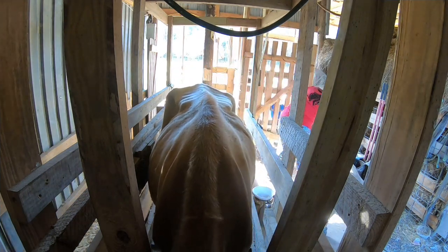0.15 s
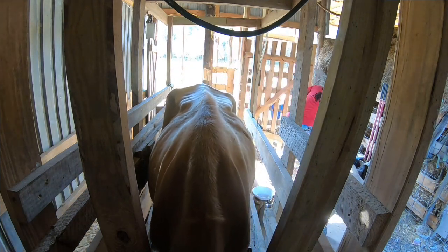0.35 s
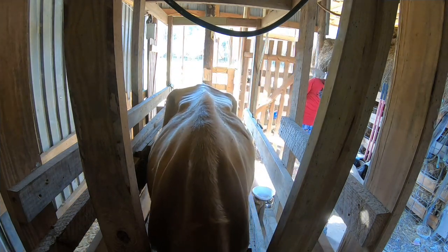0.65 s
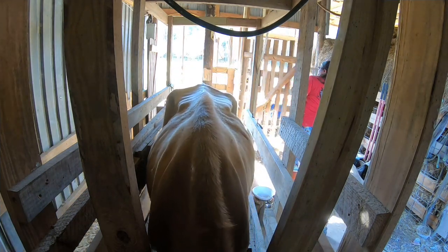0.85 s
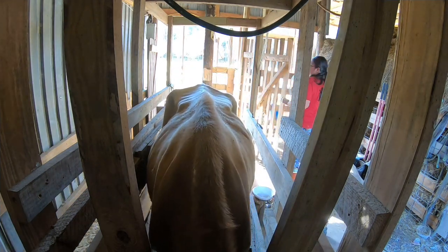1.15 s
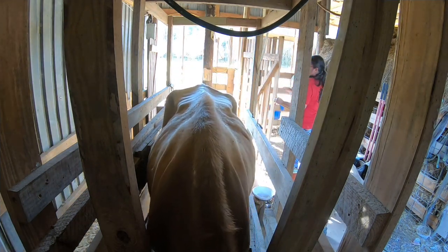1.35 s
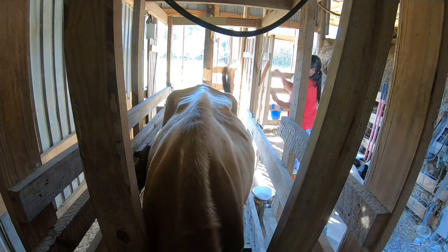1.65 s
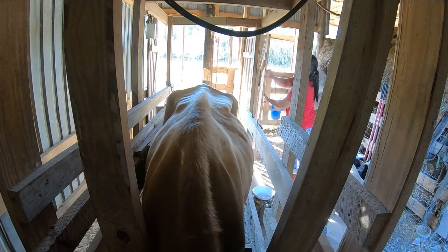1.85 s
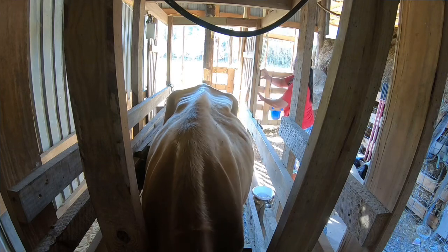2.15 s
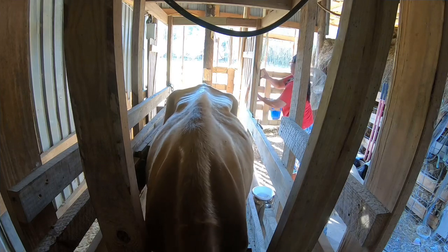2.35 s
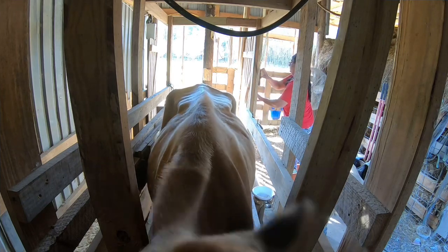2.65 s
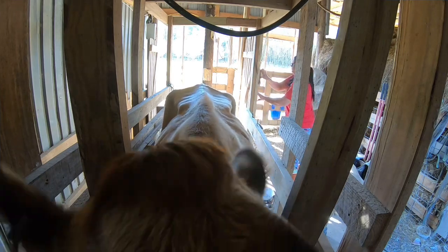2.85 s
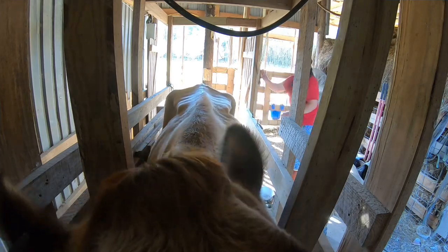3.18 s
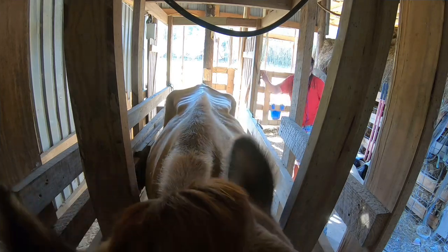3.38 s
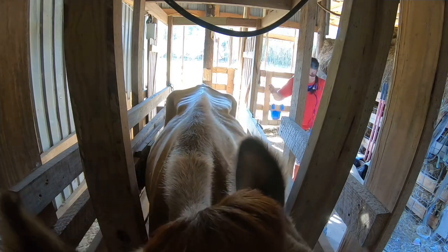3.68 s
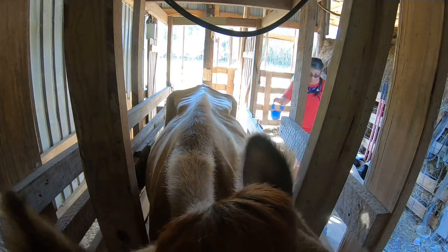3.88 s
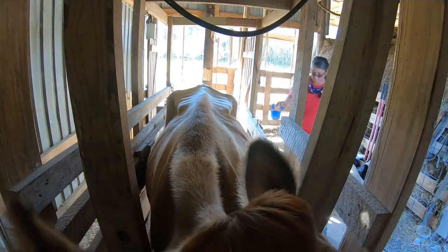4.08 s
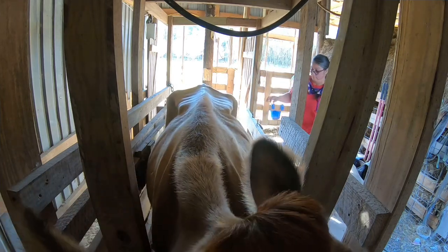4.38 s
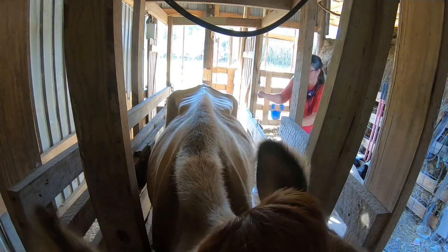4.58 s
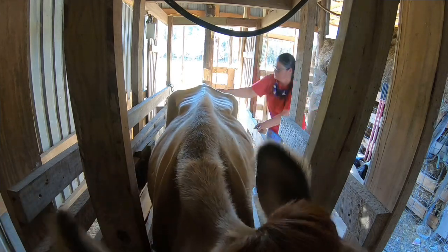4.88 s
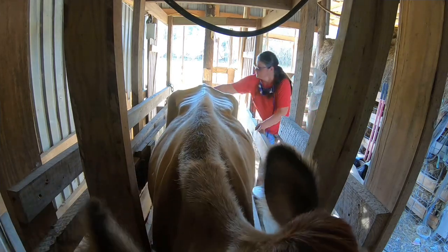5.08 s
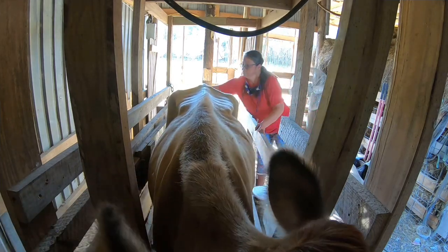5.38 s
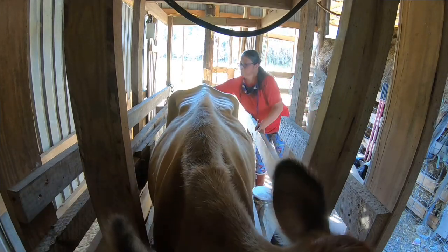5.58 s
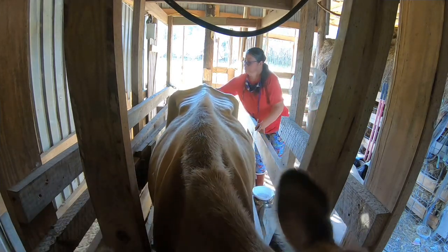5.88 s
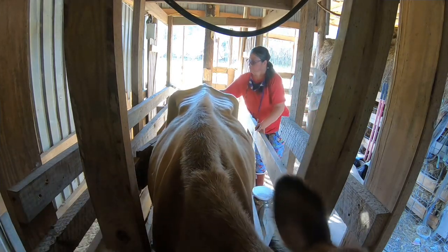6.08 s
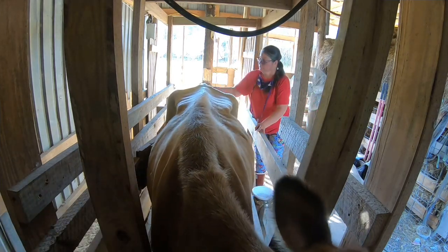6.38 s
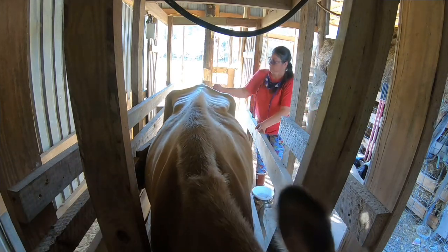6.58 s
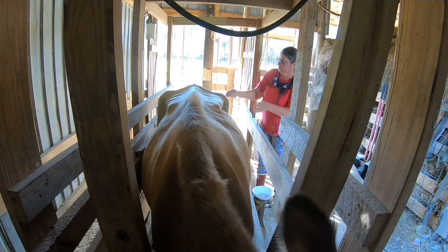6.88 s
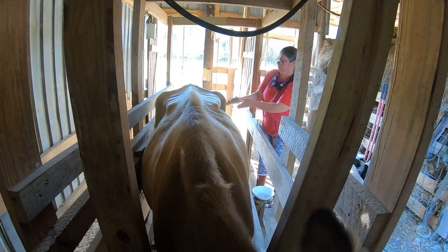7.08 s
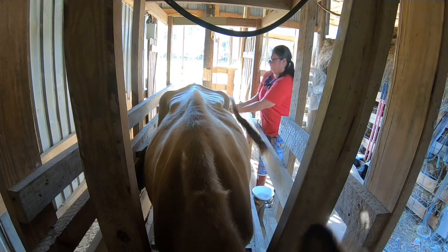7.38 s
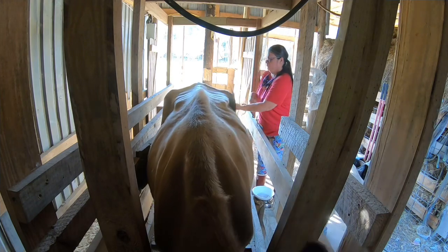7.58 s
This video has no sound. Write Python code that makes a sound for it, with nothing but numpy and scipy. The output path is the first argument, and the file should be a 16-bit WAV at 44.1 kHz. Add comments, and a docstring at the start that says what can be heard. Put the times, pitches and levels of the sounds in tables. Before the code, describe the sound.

Gate bang and latch clack, heavy dull thuds, crisp stalk snapping close by, then a rapid stuttering wooden creak with tiny metallic tinkles.

```python
"""A cow stands in a wooden milking stall, noses through dry feed, shuffles and leans on the frame until it judders.
Feed, bedding, swishes and scrapes are grainy filtered noise; stalks and frame click; thuds are decaying modes.
A gate bumps shut and is latched: decaying wood modes plus a clack of many contacts. The frame also creaks.
Small metal links tinkle, one light tap rings, a far bird chirps once over quiet filtered-noise air.
The boards of the open shed add a short echo of decaying noise."""
import sys
import numpy as np
from scipy import signal
from scipy.fft import rfft, irfft
from scipy.io import wavfile
from scipy.ndimage import map_coordinates

SR = 44100
rng = np.random.default_rng(int(sys.argv[2]) if len(sys.argv) > 2 else 0)


def to_wav(sig):
    """Store sig (one row per channel, or 1-D mono) as 16-bit WAV at the path in sys.argv[1].

    Samples outside -1..1 are clipped; the rate is SR.
    """
    pcm = np.clip(np.atleast_2d(sig), -1, 1) * 32767
    pcm = np.round(pcm).astype(np.int16)
    wavfile.write(sys.argv[1], SR, pcm.T)  # frames by channels


N = 341327
TIME = np.arange(N) / SR
AGE = np.arange(SR) / SR  # s since a blow
TOP_HZ = 14600
ATTACK_S, CLICK_ATTACK_S = 0.004, 0.0005  # pushes, board bursts and creaks; clicks and slips
WOOD_RIPPLE_DB, SHIFTING_DB = 3, 5  # random spread of timber resonances; swell of stalk resonances

# level curve of the fine rustle, faint background hiss at first, dry feed from about 3 s: time_s, level_db
RUSTLE_CURVE = [(0.0, -62), (0.68, -73), (1.0, -62), (2.98, -70.5), (3.21, -30.5), (3.47, -34.5),
                (4.22, -47.5), (4.59, -40.5), (5.52, -52), (6.27, -47), (6.7, -52.5), (7.11, -50),
                (7.74, -70)]


def amp(db):
    """Decibels to gain."""
    return 10 ** (np.asarray(db) / 20)


def fade(t60_s):
    """Exponential decay after a blow, 60 dB in t60_s."""
    return np.exp(-np.log(1000) * AGE / max(t60_s, 1e-3))


def swell(curve):
    """Gain along a (time_s, level_db) curve."""
    return amp(np.interp(TIME, *np.transpose(curve)))


def stroke(hold_s, attack_s, release_s):
    """Envelope of one movement: it builds, holds and dies away; hold_s includes the attack."""
    age_s = np.arange(2 * SR) / SR
    return np.minimum(age_s / attack_s, 1) * np.exp(-np.maximum(age_s - hold_s, 0) / release_s)


def add(track, start_s, sound):
    """Mix a sound into the track at a given time."""
    start = int(np.clip(start_s * SR, 0, N - 1))
    track[:, start:start + sound.shape[-1]] += sound[..., :N - start]


def colour(x, spectrum, tilt_db=0, size=4096):
    """Minimum-phase filter from (Hz, dB) points and a slope per octave; white noise keeps its power."""
    octave = np.log2(np.arange(size // 2 + 1) * SR / size + 1)
    hz, db = np.transpose(spectrum)
    gain = amp(np.interp(octave, np.log2(hz), db) + tilt_db * octave)
    cepstrum = irfft(np.log(gain / np.sqrt(np.mean(gain ** 2))))
    # folding the cepstrum makes the filter causal
    cepstrum[1:size // 2] *= 2
    cepstrum[size // 2 + 1:] = 0
    impulse = irfft(np.exp(rfft(cepstrum)))
    return signal.fftconvolve(x, impulse[None], axes=1)[:, :x.shape[1]]


def treble(x, hz, order=1):
    """High-pass."""
    return signal.sosfilt(signal.butter(order, min(hz, SR / 3), "high", fs=SR, output="sos"), x)


def spread(pair, pan_db=0, width=1):
    """Two unrelated signals to left and right: most alike in the bass, less alike towards the treble."""
    side = width * (0.35 * pair[1] + 0.21 * treble(pair[1], 580))
    pan = amp(np.array([[pan_db], [-pan_db]]) / 2)
    return (pair[0] + np.array([side, -side])) * pan


def hiss(count, pan_db=0, width=1):
    """Stereo noise; positive pan is left."""
    return spread(rng.standard_normal((2, count)), pan_db, width)


def grains(count, rate, scatter_db, grain_s=0.0056):
    """Envelope of tiny fractures (rate per second), a few large among many small; rms 1."""
    sizes = amp(scatter_db * np.minimum(rng.exponential(size=count), 4.5))
    hits = sizes * (rng.random(count) < rate / SR)
    power = signal.lfilter([1], [1, -np.exp(-1 / (grain_s * SR))], hits ** 2)
    return np.sqrt(power / power.mean())


def chatter(t60_s, pan_db, width):
    """Dying rattle of many small contacts after a blow."""
    return hiss(SR, pan_db, width) * grains(count=SR, rate=3000, scatter_db=2.5) * fade(t60_s)


def ring(modes, onset_s):
    """Decaying modes (Hz, dB, t60 s) that build up while the contact lasts."""
    tone = sum(amp(db) * fade(t60_s) * np.sin(2 * np.pi * hz * AGE) for hz, db, t60_s in modes)
    return tone * (1 - np.exp(-AGE / onset_s))


def hump(hz):
    """Spectrum with one broad pitch: (Hz, dB) points."""
    return [(0.5 * hz, -20), (0.63 * hz, -4), (hz, 0), (1.134 * hz, -2), (2.15 * hz, -18), (5 * hz, -42)]


def woody(spectrum, count=56):
    """Every blow lands on another spot and favours other resonances of the timber."""
    hz, db = np.transpose(spectrum)
    fine_hz = np.geomspace(hz[0], hz[-1], count)
    ripple_db = WOOD_RIPPLE_DB * rng.standard_normal(count) * np.clip(fine_hz / 600, 0, 1)
    return np.column_stack([fine_hz, np.interp(np.log(fine_hz), np.log(hz), db) + ripple_db])


def sink(sound, sag, settle_s):
    """The pitch starts higher by the share sag and settles as the strain eases."""
    age_s = np.arange(sound.shape[-1]) / SR
    clock_s = age_s + sag * settle_s * (1 - np.exp(-age_s / settle_s))
    return np.array([np.interp(clock_s, age_s, ear) for ear in np.atleast_2d(sound)])


def shifting(x, scrapes_per_s=35, size=256):
    """From scrape to scrape other stalks resonate: neighbouring bands swell and fade on their own."""
    hz, time_s, bands = signal.stft(x, SR, nperseg=size)
    place = np.meshgrid(time_s * scrapes_per_s, np.pi * np.log2(1 + hz / 1000))
    walk = map_coordinates(rng.standard_normal((2 * size, size)), place, order=1)
    return signal.istft(bands * amp(SHIFTING_DB * walk), SR, nperseg=size)[1][:, :N]


def knocks(blows, modes, clack, onset_s, pan_db, width):
    """Each blow rings the timber's main modes and a chattering clack of higher ones."""
    out, tone = np.zeros((2, N)), ring(modes, onset_s)
    for start_s, ring_db, clack_db, t60_s, tilt_db in blows:
        rattle = colour(chatter(t60_s, pan_db, width), woody(clack), tilt_db)
        add(out, start_s, amp(ring_db) * tone + amp(clack_db) * rattle)
    return out


def shed(x, t60_s=0.16, wet_db=-8):
    """Board walls give a short echo; the bass escapes through the open sides."""
    tail = hiss(SR) * fade(t60_s) * (1 - np.exp(-AGE / 0.00032))
    tail = treble(tail / np.sqrt(np.sum(tail ** 2) / 2), 290)
    return x + amp(wet_db) * signal.fftconvolve(x, tail, axes=1)[:, :N]


def yard(air_db=-58, chirp_db=-54, chirp_s=0.08):
    """Quiet outdoor air as filtered noise and one thin rising chirp as a swept sine."""
    # air spectrum: freq_hz, level_db
    air_spectrum = [(25, -4), (170, -7), (600, -4), (3000, -13), (7500, -29), (10500, -73)]
    out = amp(air_db) * colour(hiss(N), air_spectrum)
    phase = np.linspace(0, np.pi, int(chirp_s * SR))
    hz = 6900 + 1400 * np.sin(phase / 2)
    chirp = np.sin(phase) * np.sin(2 * np.pi * np.cumsum(hz) / SR)
    add(out, 1.15, amp(chirp_db) * chirp)
    return out


def links(ring_db=0, tick_db=-2.0, vary_db=2, detune_hz=25, blur_hz=70):
    """Small metal links tick and ring very high, each touch favouring other modes; rubbing blurs their pitch."""
    # links touching: start_s, level_db
    touches = [(5.93, -42.5), (6.295, -44), (6.367, -42), (6.5953, -34.5), (6.661, -44), (7.0913, -37.5),
               (7.374, -42.5), (7.62, -48)]
    # link resonances before random variation: freq_hz, level_db, t60_s
    link_modes = [(12700, 2, 0.49), (13450, -2, 0.23)]
    out = np.zeros((2, N))
    for start_s, db in touches:
        tones = []
        for ear in rng.standard_normal((2, len(link_modes))):
            varied = [(hz + detune_hz * c, size_db + vary_db * c, t60_s)
                      for (hz, size_db, t60_s), c in zip(link_modes, ear)]
            tones.append(ring(varied, onset_s=0.00064))
        drift = np.cumsum(rng.standard_normal(SR)) * np.sqrt(2 * np.pi * abs(blur_hz) / SR)
        # the links keep rubbing as they ring
        rubbing = grains(count=SR, rate=350, scatter_db=3.5) * np.sqrt(2) * np.cos(drift)
        tick = treble(hiss(SR) * fade(0.5), 3100, order=2)
        add(out, start_s, amp(db + ring_db) * np.array(tones) * rubbing + amp(db + tick_db) * tick)
    return out


def tap(start_s=7.516, ring_db=-35, click_db=-39, click_hz=1400):
    """One light tap leaves a small hard thing ringing in two close pairs of modes."""
    # tapped object's resonances: freq_hz, level_db, t60_s
    tap_modes = [(1177, 0.5, 0.12), (1245, -1, 0.16), (2200, -8, 0.15), (2350, -6.5, 0.14)]
    click = colour(hiss(SR) * fade(0.2), hump(click_hz))
    out = np.zeros((2, N))
    add(out, start_s, amp(ring_db) * ring(tap_modes, onset_s=0.0015) + amp(click_db) * click)
    return out


def gate():
    """The gate bumps its post: low timber modes and a clack."""
    # bumps: start_s, ring_db, clack_db, clack_t60_s, tilt_db_per_octave
    bumps = [(.346, -7.5, -20, 0.54, 0), (.395, -35, -23, 0.27, 4), (.461, -37, -19.5, 0.19, 2)]
    # gate resonances: freq_hz, level_db, t60_s
    modes = [(150.5, 6, 0.36), (207, -13, 0.63), (218.4, 3, 0.2), (358.3, -9, 0.43), (1004, 19, 0.022),
             (1740, 1.5, 0.046)]
    # clack spectrum before tilt and ripple: freq_hz, level_db
    clack = [(70, -7), (140, 13), (380, 2), (620, -7.5), (950, 6.5), (1200, -4), (1550, 2), (2400, -13),
             (4200, -30), (8000, -38.5), (14000, -65)]
    return knocks(bumps, modes, clack, onset_s=0.021, pan_db=-1.5, width=0.73)


def latch():
    """The latch strikes wood: timber modes and a clack."""
    # strikes: start_s, ring_db, clack_db, clack_t60_s, tilt_db_per_octave
    strikes = [(.736, -27.5, -16.5, 0.25, -4), (.887, -39.5, -32.5, 0.64, -6.5),
               (2.563, -71, -30.5, 0.2, 0.5), (4.401, -44, -25.5, 0.39, -5)]
    # latch and wood resonances: freq_hz, level_db, t60_s
    modes = [(203.5, 11, 0.38), (416.4, 6.5, 0.27), (1024, 5.5, 0.3), (1420, -14, 0.52), (2062, -4, 0.16),
             (2832, -7, 0.2)]
    # clack spectrum before tilt and ripple: freq_hz, level_db
    clack = [(60, -32), (200, -3), (700, 2), (1200, 9), (1900, 6), (3300, 7), (4800, -6), (8500, -7),
             (14000, -39)]
    return knocks(strikes, modes, clack, onset_s=0.015, pan_db=-1.5, width=0.81)


def judder(ring_db=-6.0, clack_db=6.0, creak_db=-4, creak_release_s=0.013, creak_hz=980, sag=0.98,
           settle_s=0.014):
    """Wood sticks and slips at uneven intervals: a creak falling in pitch, a clack and the frame's ring."""
    # slips under the cow's weight: start_s, level_db, pitch_ratio of clack and creak
    slips = [(5.738, -36, 1.37), (5.833, -27.5, 0.665), (5.88, -31, 0.91), (5.933, -23.5, 0.7),
             (5.984, -25.5, 0.94), (6.091, -30, 1.17), (6.114, -31, 0.75), (6.14, -22, 0.74),
             (6.194, -29.5, 1.03), (6.234, -23.5, 0.85), (6.289, -24.5, 1.1), (6.356, -25.5, 1.16),
             (6.398, -22, 0.84), (6.424, -24.5, 0.82), (6.464, -27, 1.41), (6.781, -39, 1.06)]
    # frame resonances before random stretch: freq_hz, level_db, t60_s
    frame_modes = [(63.7, 1.5, 1.66), (134.3, 5.5, 0.38), (208.4, 10, 0.29), (360, 14, 0.14),
                   (444.4, 7, 0.22), (543.8, 13, 0.16), (699.5, 13.5, 0.12), (1127, 15, 0.094)]
    # clack spectrum at pitch ratio 1, before ripple: freq_hz, level_db
    frame_clack = [(50, -18), (200, 6), (780, 7), (1300, 4), (2000, -11), (3400, -24), (9000, -48),
                   (14000, -52)]
    out = np.zeros((2, N))
    tone = ring(frame_modes, onset_s=0.024)
    grip = 1 - np.exp(-AGE / CLICK_ATTACK_S)
    slide = stroke(0.015, ATTACK_S, creak_release_s)[:SR]
    for start_s, db, pitch in slips:
        strained = np.interp(AGE * (1 + 0.024 * rng.standard_normal()), AGE, tone)
        clack_spectrum = woody([(hz * pitch, size_db) for hz, size_db in frame_clack])
        clack = colour(chatter(0.15, pan_db=3.0, width=0.84), clack_spectrum) * grip
        creak = sink(colour(hiss(SR), woody(hump(creak_hz * pitch))), sag, settle_s) * slide
        slip = amp(ring_db) * strained + amp(clack_db) * clack + amp(creak_db) * creak
        add(out, start_s, amp(db) * slip)
    return out


def board_bursts(pan_db=-2, sag=0.25, release_s=0.022):
    """Short grainy bursts of wood-coloured noise, sinking in pitch: swishes, scrapes and dull knocks."""
    # swishes, scrapes and dull knocks: start_s, hold_s, level_db, settled pitch_hz
    bursts = [(2.073, 0.031, -50, 2630), (2.321, 0.02, -48, 704), (2.894, 0.17, -52.5, 3240),
              (3.343, 0.0071, -24.5, 2070), (4.229, 0.01, -40.5, 1950), (4.393, 0.013, -23.5, 2170),
              (4.96, 0.01, -41, 2480), (5.147, 0.036, -46, 2400), (5.657, 0.0076, -37, 1770),
              (7.216, 0.1, -46.5, 2820)]
    out = np.zeros((2, N))
    for start_s, hold_s, db, hz in bursts:
        roughness = grains(count=2 * SR, rate=1000, scatter_db=1.5)
        force = stroke(hold_s, ATTACK_S, release_s) * roughness
        burst = colour(hiss(2 * SR, pan_db) * force, woody(hump(hz)))
        add(out, start_s, amp(db) * sink(burst, sag, release_s))
    return out


def thuds(sag=0.367, settle_s=0.061):
    """Soft heavy blows ring a board's lowest modes; the pitch sinks as the weight settles on it."""
    # hooves and flanks against the boards: start_s, level_db, settled pitch_hz, nominal t60_s
    blows = [(1.352, -4.5, 148, 0.031), (1.625, -24.5, 140, 0.55), (2.215, -4.5, 143, 0.044),
             (2.263, -16, 116.4, 0.18), (2.389, -30, 82, 0.63), (3.98, -22.5, 125.6, 0.22),
             (4.052, -14.5, 110, 0.081), (4.831, -21.5, 119.7, 0.44), (5.075, -9, 117.8, 0.35),
             (6.792, -24, 168.8, 0.35), (6.9, -26.5, 304.5, 0.21), (7.619, -31, 149, 0.11)]
    out = np.zeros((2, N))
    for start_s, db, hz, t60_s in blows:
        board = [(hz, 0, t60_s), (0.646 * hz, -12, t60_s), (1.5 * hz, -10, 0.66 * t60_s)]
        add(out, start_s, amp(db) * sink(ring(board, onset_s=0.023), sag, settle_s))
    return out


def shuffling(rest_sway_db=-65, rest_scuff_db=-50, pan_db=2, straw_pan_db=-3):
    """With each shift of weight the stall rumbles, feet scuff the bedding in dull lumps and straw swishes."""
    # weight shifts: start_s, hold_s, rumble_db, scuff_db, straw_db
    shifts = [(0, 0.0055, -75, -39.5, -46.5), (1.374, 0.18, -46.5, -38, -43.5),
              (1.831, 0.46, -70, -48.5, -50.5), (2.044, 0.55, -44, -44.5, -79),
              (3.031, 0.41, -37.5, -41, -45.5), (3.534, 0.44, -63, -48, -52.5),
              (4.428, 0.37, -73, -45, -47), (5.065, 0.043, -30.5, -37.5, -58),
              (5.808, 0.63, -34, -29.5, -39), (6.77, 0.29, -37.5, -41, -49)]
    # stall rumble spectrum: freq_hz, level_db
    sway_spectrum = [(12, 2.5), (28, 7.5), (64, 14), (100, 2.5), (200, -40), (600, -50)]
    # scuffed bedding spectrum: freq_hz, level_db
    bedding_spectrum = [(40, -30), (90, 0.5), (170, 6.5), (300, -5.5), (600, -19.5), (2500, -39),
                        (14000, -66)]
    # loose straw spectrum: freq_hz, level_db
    straw_spectrum = [(150, 2.5), (450, 6.5), (1800, -11), (3200, -10), (5000, -23), (8500, -23),
                      (14000, -76)]
    force = np.zeros((3, N))
    for start_s, hold_s, *levels_db in shifts:
        add(force, start_s, amp(levels_db)[:, None] * stroke(hold_s, attack_s=0.0096, release_s=0.12))
    sway, drag, swish = force
    rumble = colour(hiss(N, pan_db) * (sway + amp(rest_sway_db)), sway_spectrum)
    lumps = grains(count=N, rate=550, scatter_db=4.5) * np.hypot(drag, amp(rest_scuff_db))
    scuff = colour(hiss(N, pan_db) * lumps, bedding_spectrum)
    stems = grains(count=N, rate=13000, scatter_db=6.0) * swish
    straw = colour(hiss(N, straw_pan_db) * stems, straw_spectrum)
    return rumble + scuff + shifting(straw)


def clicks(pan_db=-2, width=2, click_t60_s=0.011, rattle_db=-14, rattle_t60_s=0.041, rattle_hz=6500):
    """Short noise clicks with a broad pitch, each with a longer rattle around a fixed pitch."""
    # stalks snapping, plus a few clicks of the creaking frame: start_s, level_db, pitch_hz
    short_clicks = [(1.516, -26.5, 2130), (3.0185, -12, 2950), (3.041, -20, 3320), (3.29, -16.5, 3440),
                    (3.3097, -14, 2860), (3.3468, -35, 2760), (3.449, -6.5, 2760), (3.743, -28.5, 3330),
                    (3.844, -16, 3200), (4.044, -29, 2800), (4.12, -29, 1700), (4.191, -27, 3240),
                    (4.401, -29, 2120), (4.612, -20, 3300), (4.726, -27, 2860), (4.773, -25.5, 3140),
                    (5.262, -27.5, 1720), (5.288, -25, 6650), (5.331, -23, 9300), (5.576, -26.5, 3350),
                    (5.715, -22.5, 1280), (6.055, -24, 7640), (6.371, -23, 7250), (6.766, -23, 1360)]
    out = np.zeros((2, N))
    for start_s, db, hz in short_clicks:
        envelope = fade(click_t60_s) * (1 - np.exp(-AGE / CLICK_ATTACK_S))
        click = colour(hiss(SR, pan_db, width) * envelope, hump(hz))
        rattle = colour(chatter(rattle_t60_s, pan_db, width), hump(rattle_hz))
        add(out, start_s, amp(db) * (click + amp(rattle_db) * rattle))
    return out


def crackles(low_hz=1400, high_hz=7000, strongest_db=13, range_db=18, count=520):
    """Tiny noise clicks all through the fine rustle, each with its own pitch and strength."""
    out, effort = np.zeros((2, N)), swell(RUSTLE_CURVE)
    decay = fade(0.016)[:SR // 20]
    for when, pitch, weak in rng.random((count, 3)):
        hz = low_hz * (high_hz / low_hz) ** pitch
        click = colour(hiss(len(decay), width=1.25) * decay, hump(hz))
        gain = effort[int(when * N)] * amp(strongest_db - range_db * weak)
        add(out, when * TIME[-1], gain * click)
    return out


def feed(bed_db=-4, husk_db=-10, crunch_db=-5, crackle_db=-3, pan_db=-4.5, width=1.0):
    """Over a fine rustle each push of the muzzle breaks stalks and husks and has a colour of its own."""
    # pushes of the muzzle: start_s, hold_s, relative level_db, husk level re push bright_db
    pushes = [(3.029, 0.076, -27.5, -13), (3.123, 0.01, -31.5, -7), (3.201, 0.04, -29, -11),
              (3.604, 0.0065, -31, 4), (3.652, 0.02, -28.5, -26), (3.827, 0.06, -38, 2.5),
              (3.895, 0.03, -29, -5.5), (4.464, 0.0083, -31.5, -11), (4.63, 0.03, -27.5, -4.5),
              (5.327, 0.01, -36.5, 3), (6.312, 0.077, -35, -17)]
    # feed spectrum: freq_hz, level_db
    feed_spectrum = [(150, -5.5), (400, 1.5), (1200, 6.5), (2200, 7.5), (3400, 11), (5000, -7.5),
                     (9300, -3.5), (14000, -78)]
    rustle = swell(RUSTLE_CURVE)[None]
    stalks = hiss(N, pan_db, width) * grains(count=N, rate=1600, scatter_db=2.5)
    out = shifting(colour(stalks * amp(bed_db) * rustle, feed_spectrum))
    crisp = amp(husk_db) * rustle
    for start_s, hold_s, db, bright_db in pushes:
        push = stroke(hold_s, ATTACK_S, release_s=0.011)
        broken = np.roll(stalks, -int(start_s * SR), axis=1)[:, :len(push)] * push
        add(out, start_s, amp(db + crunch_db) * colour(broken, woody(feed_spectrum)))
        add(crisp, start_s, amp(db + bright_db + crackle_db) * push)
    husks = hiss(N, pan_db, width) * grains(count=N, rate=2200, scatter_db=9.0, grain_s=0.005) * crisp
    return out + colour(husks, [(2500, -13), (5500, -7.0), (9500, -1.0), (14500, -19.0)])


def scene():
    """Everything in the stall and the yard behind it, through the shed's echo."""
    surroundings = yard() + links() + tap()
    timber = gate() + latch() + judder() + board_bursts()
    cow = thuds() + shuffling() + clicks() + crackles() + feed()
    return shed(surroundings + timber + cow)


def record(dry, soft_hz=11500):
    """The left channel lags by one sample; low-passes soften the treble and cut the top."""
    ports = np.array([np.append(0, dry[0, :-1]), dry[1]])
    soft = signal.sosfilt(signal.butter(2, min(soft_hz, TOP_HZ), fs=SR, output="sos"), ports)
    return signal.sosfilt(signal.ellip(8, 0.2, 70, TOP_HZ, fs=SR, output="sos"), soft)


dry = scene()
out = record(dry)
to_wav(out)
```